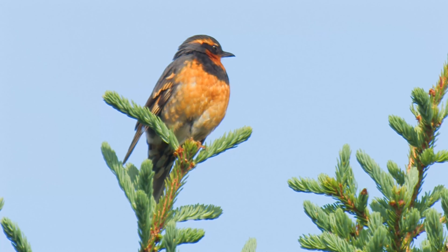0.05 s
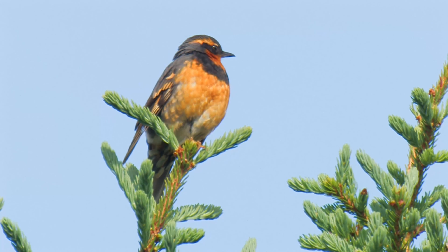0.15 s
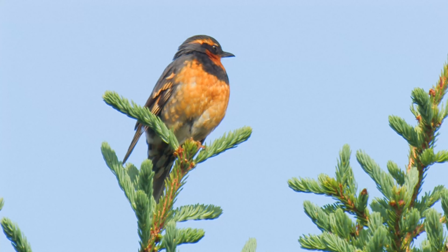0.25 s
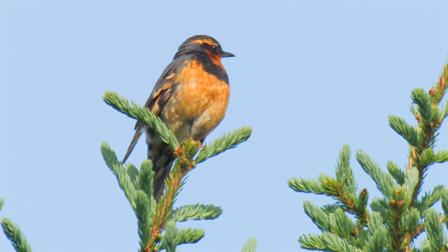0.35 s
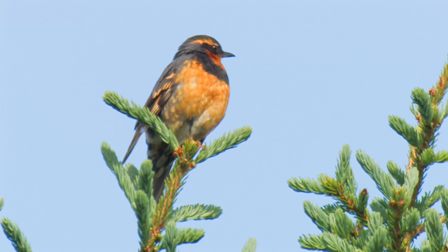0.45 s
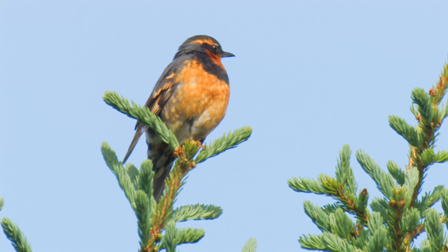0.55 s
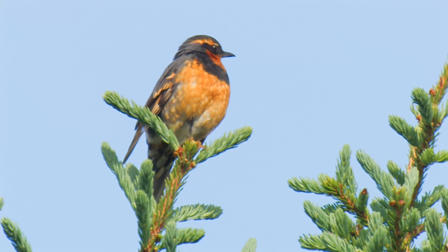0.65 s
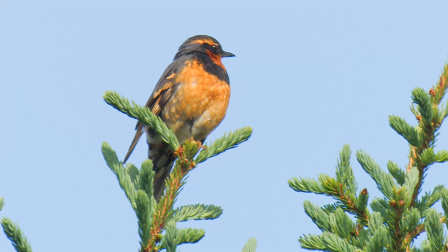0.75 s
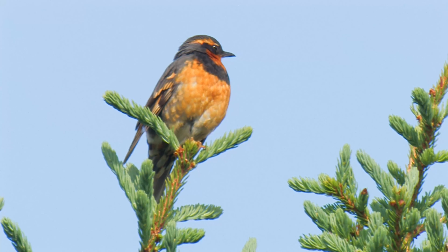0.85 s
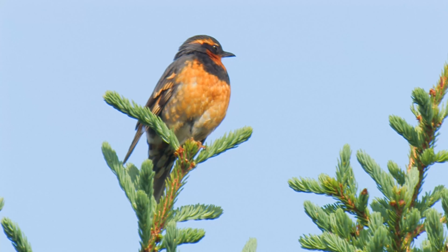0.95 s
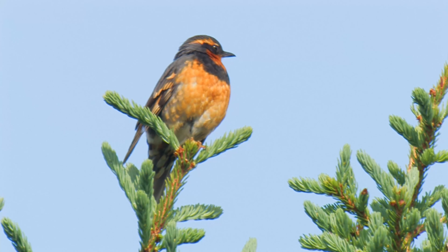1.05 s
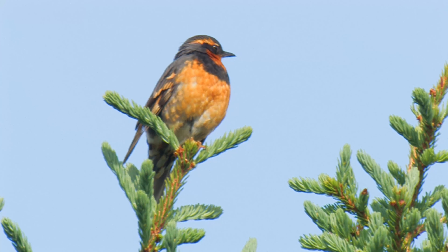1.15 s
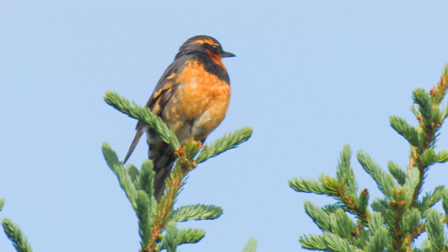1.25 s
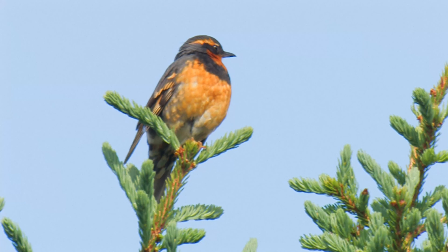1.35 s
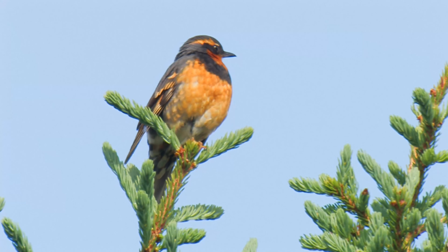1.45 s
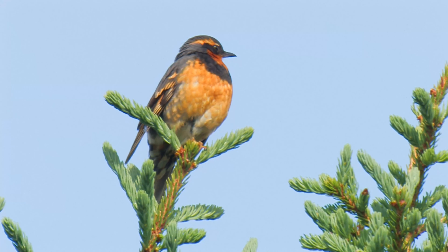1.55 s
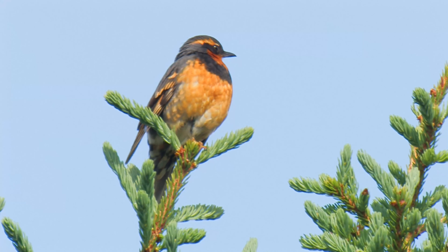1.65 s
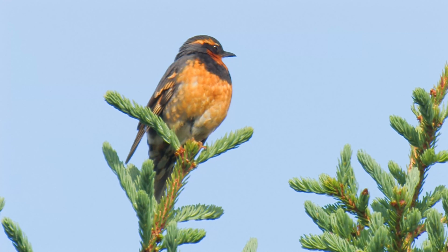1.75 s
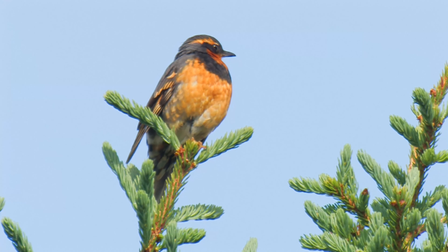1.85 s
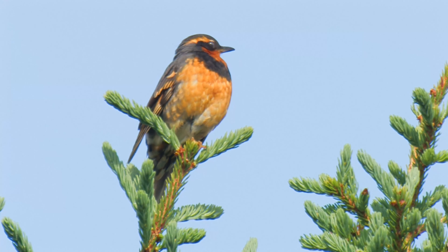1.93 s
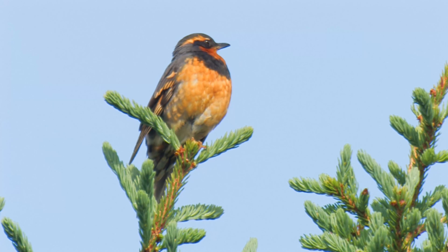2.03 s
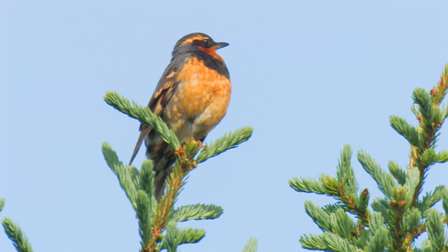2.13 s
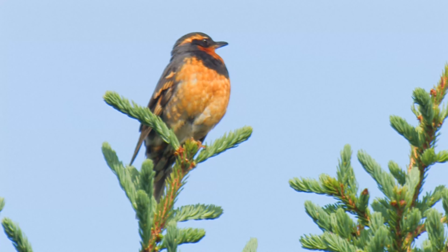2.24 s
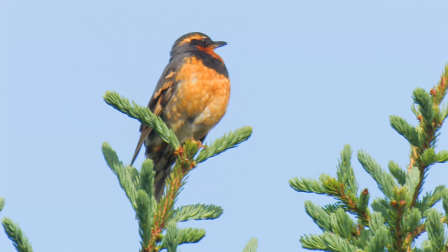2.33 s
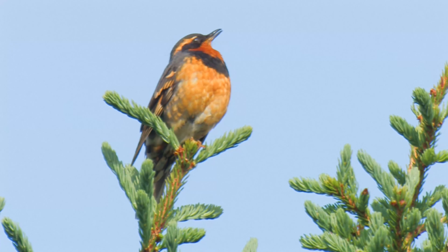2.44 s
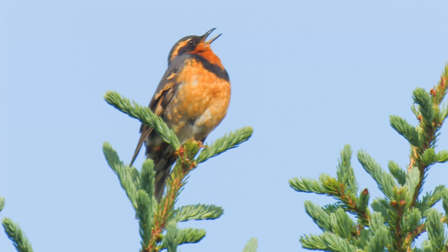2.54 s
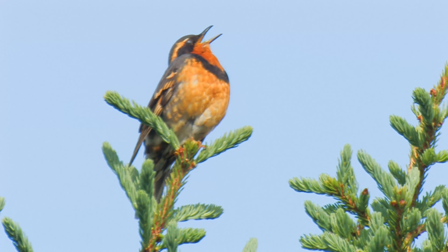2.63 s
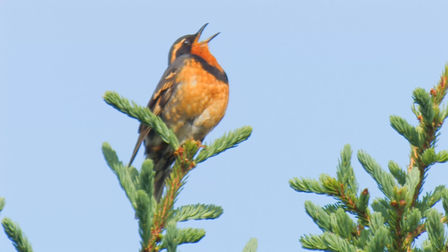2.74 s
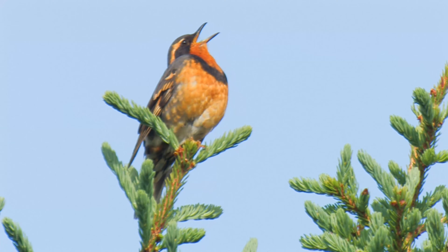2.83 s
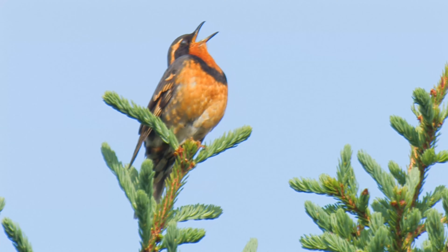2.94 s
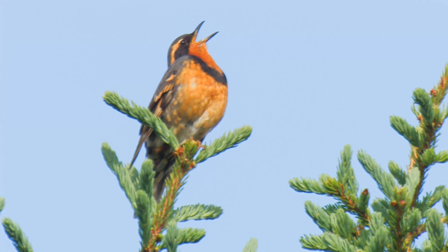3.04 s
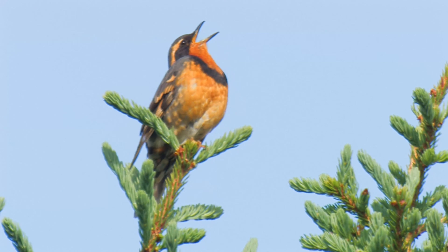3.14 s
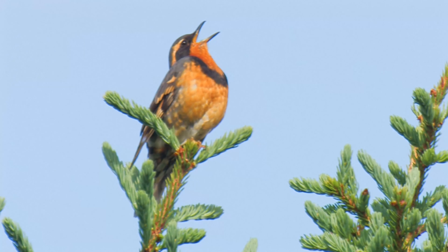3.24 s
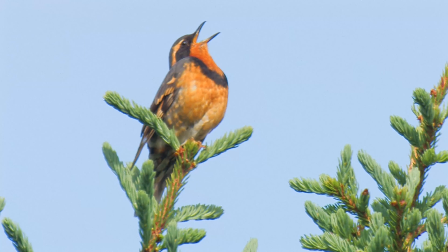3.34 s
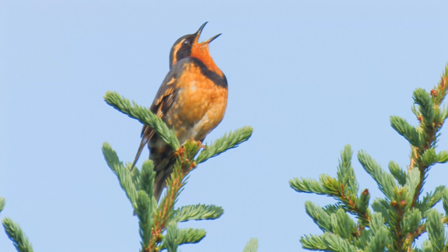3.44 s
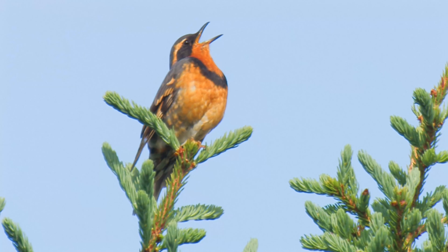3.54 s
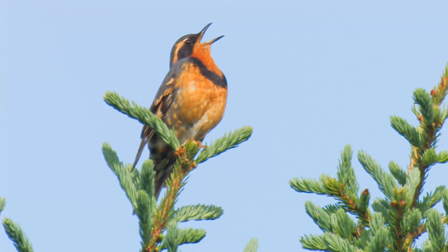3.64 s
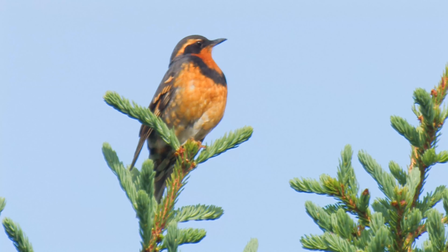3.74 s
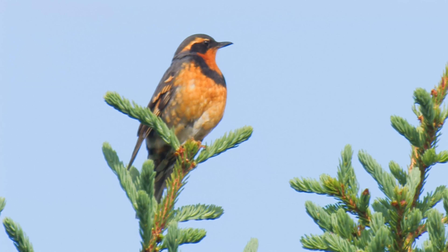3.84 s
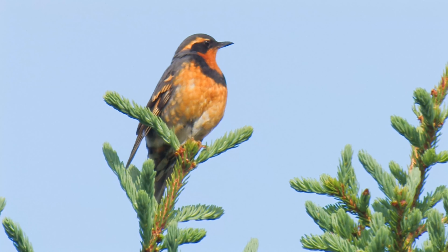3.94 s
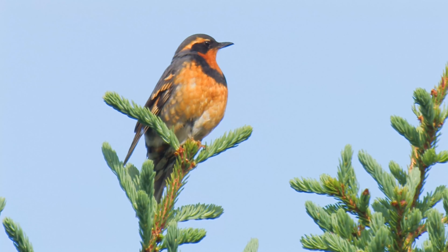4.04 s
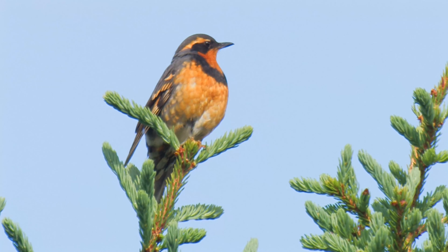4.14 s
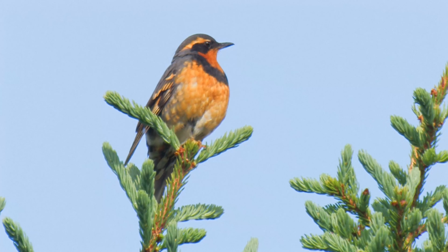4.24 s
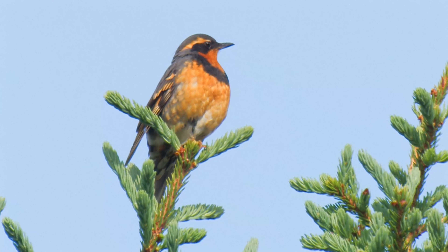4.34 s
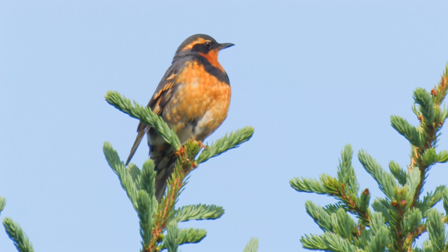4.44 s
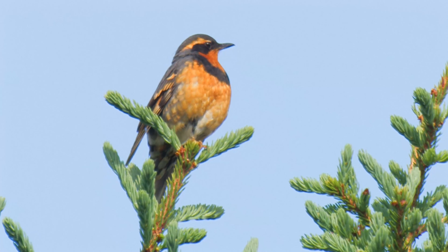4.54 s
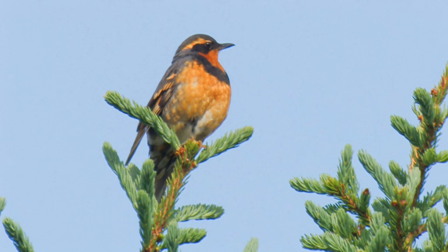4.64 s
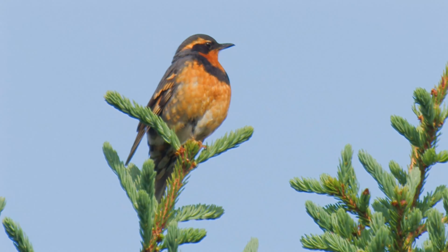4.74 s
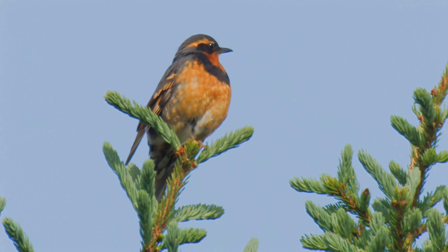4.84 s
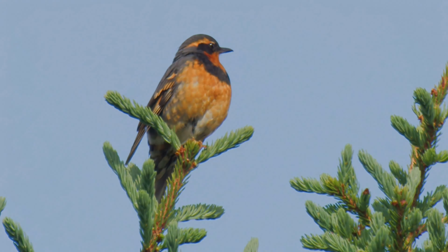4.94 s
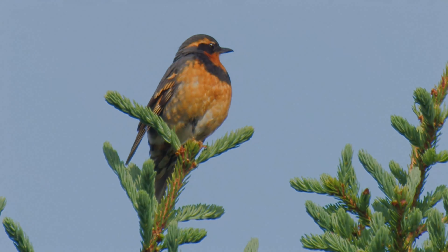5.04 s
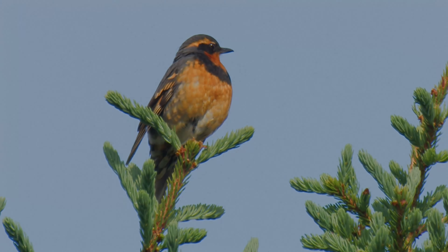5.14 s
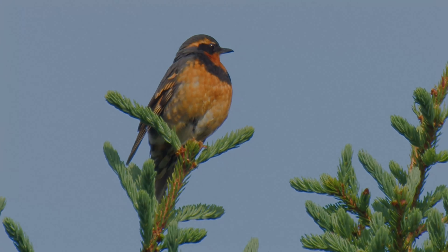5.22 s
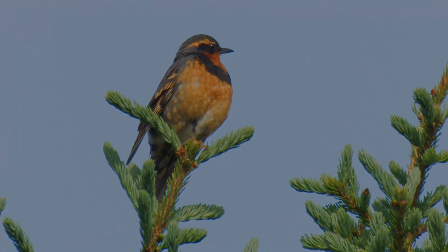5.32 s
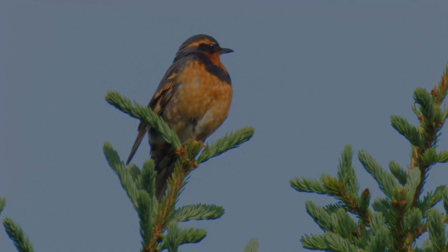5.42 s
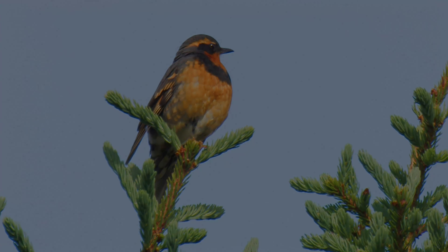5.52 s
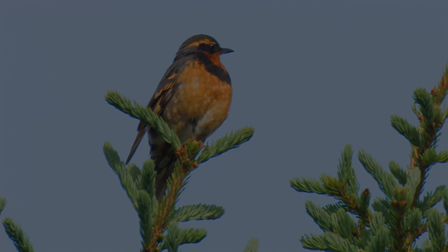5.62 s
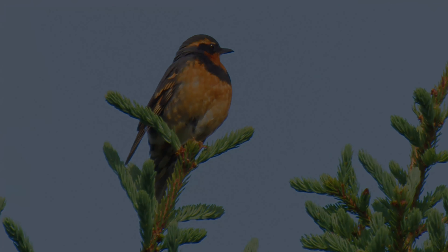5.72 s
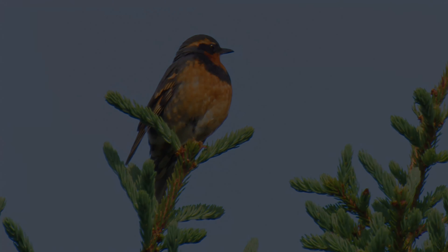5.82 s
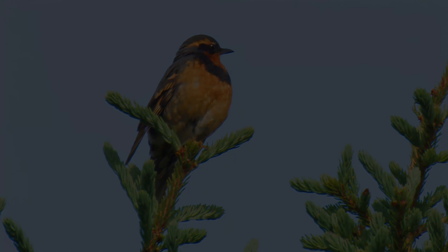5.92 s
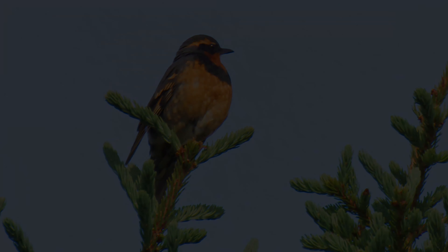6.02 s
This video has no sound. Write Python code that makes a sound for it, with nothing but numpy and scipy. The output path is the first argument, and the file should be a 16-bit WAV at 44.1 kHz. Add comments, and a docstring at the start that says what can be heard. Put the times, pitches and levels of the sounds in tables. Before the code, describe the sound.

Outdoors among trees, a soft low rush and a light microphone hiss run steadily. Faraway birds open with quick high twitters, falling slurs and a few rising chirps, all blurred by echo. A thrush stands out in front with a single rough, buzzing whistle of just over a second that rings briefly through the forest. A rapid, high, dry trill from another bird follows and fades away with the background.

```python
"""Small birds twitter, slur and chirp deep in an echoing forest, over a low, distant rush that never stops.
At 2.6 s a thrush on a spruce top sings one long buzzy whistle: the two sides of its syrinx beat
against each other. At 4.3 s a nearer bird starts a fast dry trill. From 4.5 s everything fades out."""
import sys
import numpy as np
from scipy import signal
from scipy.fft import rfft, irfft
from scipy.io import wavfile

SR = 44100
rng = np.random.default_rng(int(sys.argv[2]) if len(sys.argv) > 2 else 0)


def unload_audio(sound):
    """Save the sound as a 16-bit wav file, at the path given as the first command line argument."""
    columns = np.transpose(np.atleast_2d(sound))
    # keep every value between -1 and 1, then stretch to whole-number steps
    steps = np.round(np.clip(columns, -1, 1) * 32767)
    wavfile.write(sys.argv[1], SR, steps.astype(np.int16))


N = 267951
TIME = np.arange(N) / SR


def amp(db):
    """Decibels to gain."""
    return 10 ** (np.asarray(db) / 20)


def unit(x):
    """Scale to rms 1."""
    return x / np.sqrt(np.mean(abs(x) ** 2) + 1e-20)


def add(mix, start_s, sound):
    """Mix a sound in, cropped at both ends of the mix."""
    at = round(start_s * SR)
    sound = sound[max(-at, 0):]
    part = mix[max(at, 0):][:len(sound)]
    part += sound[:len(part)]


def phasor(hz):
    """Unit phasor following a pitch curve."""
    return np.exp(2j * np.pi * np.cumsum(hz) / SR)


def noise(spectrum):
    """Noise of rms 1, shaped by (freq_hz, density_db) points."""
    hz, db = np.transpose(spectrum)
    bins_hz = np.fft.rfftfreq(N, 1 / SR)
    gain = amp(np.interp(np.log(bins_hz + 1), np.log(hz + 1), db))
    return unit(irfft(rfft(rng.standard_normal(N)) * gain, N))


def waver(rate_hz, size=N):
    """Random drift of rms 1, rolled off above rate_hz."""
    bins_hz = np.fft.rfftfreq(size, 1 / SR)
    return unit(irfft(rfft(rng.standard_normal(size)) / (1 + (bins_hz / rate_hz) ** 4), size))


def forest(x, wet_db, t60_s, build_s):
    """Direct sound plus echoes scattered from trunks, building up and dying away."""
    t = np.arange(int(1.5 * SR)) / SR
    taps = rng.standard_normal(len(t)) * (rng.random(len(t)) < .1)
    tail = taps * amp(-60 * t / t60_s) * (1 - np.exp(-t / build_s))
    return x + amp(wet_db) * signal.fftconvolve(x, tail / np.linalg.norm(tail))[:len(x)]


def echo(x, delay_s, level_db):
    """Direct sound plus one distinct reflection."""
    return x + amp(level_db) * np.pad(x, (round(delay_s * SR), 0))[:len(x)]


def glide(length_s, start_hz, middle_hz, end_hz, level_db, swell_db=0, quaver_hz=0):
    """Whistle bending through three pitches; quaver_hz is the depth of its random wobble."""
    u = np.linspace(0, 1, max(round(length_s * SR), 8))
    hz = np.polyval(np.polyfit([0, .5, 1], [start_hz, middle_hz, end_hz], 2), u)
    hz += quaver_hz * waver(250, size=8192)[:len(u)]
    envelope = amp(level_db + swell_db * (u - .5)) * signal.windows.tukey(len(u), .4)
    return np.sqrt(2) * envelope * phasor(hz).real


def thrush(beat_start_hz=155.8, beat_sag_hz_per_s=10, beat_jitter_hz=5, jitter_hz=6.1, flutter_db=.5):
    """Two close syrinx voices beat; their coupling adds side tones and weak overtones."""
    # main voice: time_s, pitch_hz, level_db
    whistle = [(2.63, 3080, -76), (2.652, 3030, -54), (2.696, 3043, -42.5), (2.818, 3017, -33.5),
               (2.858, 3006, -35.5), (2.99, 3000, -31.5), (3.298, 2999, -28.5), (3.54, 2963, -30.5),
               (3.72, 2900, -29.5), (3.77, 2907, -32), (3.81, 2956, -36), (3.826, 2916, -29.5),
               (3.838, 2930, -43)]
    # side tones relative to the main voice: time_s, lower_voice_db, upper_combination_tone_db
    side_tones = [(2.63, -12.5, -30), (2.95, -6.5, -27), (3.12, -8.5, -22.5), (3.45, -9, -16.5),
                  (3.72, -15.5, -18)]
    # syrinx turbulence: freq_hz, density_db
    rasp_spectrum = [(1500, -40), (2100, -18), (2450, 3), (2950, -8), (3400, -1.5), (3800, -3.5), (4250, 0),
                     (4800, -13.5), (5600, -24.5), (8000, -38.5)]
    attack_s, release_s = .011, .016
    second_db, third_db, rasp_db, full_effort_db = -42.5, -38, -32, -30
    time_s, pitch_hz, contour_db = np.transpose(whistle)
    side_s, *side_db = np.transpose(side_tones)
    lower_db, upper_db = (np.interp(TIME, side_s, db) for db in side_db)
    beat_hz = beat_start_hz - beat_sag_hz_per_s * (TIME - time_s[0])
    beat = phasor(beat_hz + beat_jitter_hz * waver(60))
    lower = amp(lower_db + 1.6 * waver(56))
    upper = amp(upper_db + 1.7 * waver(50))
    voices = 1 + lower / beat + upper * beat
    # mutual modulation: faint tones two beat rates away
    voices -= amp(-21) * lower / beat ** 2 + amp(upper_db - 15) * beat ** 2
    carrier = phasor(np.interp(TIME, time_s, pitch_hz) + jitter_hz * waver(70))
    tone = carrier * voices / np.sqrt(1 + lower ** 2)
    attack = np.clip((TIME - time_s[0]) / attack_s, 0, 1)
    release = np.sin(np.pi / 2 * np.clip((time_s[-1] - TIME) / release_s + .25, 0, 1)) ** 2
    level_db = np.interp(TIME, time_s, contour_db) + flutter_db * waver(40)
    second = amp(second_db) * tone * carrier
    # third harmonic and rasp grow with effort; the beat swings one in pitch and pulses the other
    effort = amp(.5 * (level_db - full_effort_db))
    swing = np.exp(1.1j * beat.imag + .55j * waver(120))
    third = amp(third_db) * effort * tone * carrier ** 2 * swing / beat
    rasp = amp(rasp_db) * effort * abs(tone) * noise(rasp_spectrum)
    envelope = amp(level_db - .4) * attack * release
    song = envelope * (np.sqrt(2) * (tone + second + third).real + rasp)
    near_trees = forest(song, wet_db=-15.5, t60_s=.42, build_s=.03)
    return forest(near_trees, wet_db=-23, t60_s=1.45, build_s=.05)


def trill(start_s=4.2903, period_s=.05905, slowing_s=.000092, count=30, throat_hz=(3980, 5850)):
    """Nearer bird: each syllable a falling whistle and two whip sweeps; a close echo adds flutter."""
    # strokes of one syllable: offset_s, length_s, start_hz, middle_hz, end_hz, level_db, swell_db
    strokes = [(-.002, .03, 5375, 5112, 4080, -5.5, 21), (.0252, 0.0074, 7270, 4910, 3710, -4, 16.5),
               (.0318, 0.006, 7050, 5030, 3590, -4.5, 17.5)]
    steady_db, soft_start_db, swell_s = -41.7, -16.5, .22
    song = np.zeros(N)
    for n in range(count):
        onset_s = start_s + n * period_s + slowing_s * n * (n - 1) / 2
        level_db = steady_db + soft_start_db * np.exp((start_s - onset_s) / swell_s)
        whistle_ratio, stretch, whip_ratio = 1 + np.array([.006, .015, .02]) * rng.standard_normal(3)
        force_db = level_db + .65 * rng.standard_normal(len(strokes))
        for k, (offset_s, length_s, *bend_hz, db, swell_db) in enumerate(strokes):
            bend_hz = np.array(bend_hz) * (whip_ratio if k else whistle_ratio)
            stroke = glide(length_s * stretch, *bend_hz, force_db[k] + db, swell_db)
            add(song, onset_s + offset_s * stretch, stroke)
    # throat resonance passes the middle of each sweep
    song = signal.lfilter(*signal.butter(2, throat_hz, "bandpass", fs=SR), song)
    return forest(echo(song, delay_s=.0051, level_db=-6.5), wet_db=-10.5, t60_s=.73, build_s=.015)


def twitter(break_off_s=.78, preroll_s=.5):
    """Far bird, mostly echo: a repeated motif of a rising whistle under quavering glides."""
    # motif repeats: start_s, glides_db, whistle_db
    motifs = [(-.22, -50, -52), (.008, -48.5, -49.5), (.239, -48.5, -49.5), (.467, -51.5, -51.5),
              (.69, -56, -58)]
    # glides of one motif: offset_s, length_s, start_hz, middle_hz, end_hz, level_db
    motif_glides = [(.025, 0.038, 5300, 4620, 4130, -3), (0.083, 0.027, 5900, 4740, 4080, 1),
                    (0.119, 0.024, 4760, 5460, 5800, -0.5), (0.141, .065, 5750, 5060, 4090, 0.5),
                    (.207, .025, 5400, 4600, 4130, 1.5)]
    whistle_s, whistle_hz = .06, (3300, 3560, 4020)
    preroll = round(preroll_s * SR)
    glides, whistles = np.zeros((2, N + preroll))
    for start_s, glides_db, whistle_db in motifs:
        whistle = glide(whistle_s, *whistle_hz, whistle_db, swell_db=5, quaver_hz=44.7)
        add(whistles, start_s + preroll_s, whistle)
        for offset_s, length_s, *bend_hz, db in motif_glides:
            bend_hz = np.array(bend_hz) * (1 + .01213 * rng.standard_normal())
            if start_s + offset_s < break_off_s:
                note = glide(length_s, *bend_hz, glides_db + db, quaver_hz=87)
                add(glides, start_s + offset_s + preroll_s, note)
    glides = amp(-3) * forest(glides, wet_db=4.5, t60_s=.89, build_s=.01)
    whistles = forest(whistles, wet_db=0, t60_s=.52, build_s=.0074)
    return (glides + whistles)[preroll:]


def slurs():
    """Far bird: a swelling run of falling slurs, each ending in a rising chip; trees scatter the highs."""
    # run of slurs: start_s, level_db, pitch_ratio
    run = [(1.145, -62.5, 0.98), (1.334, -56.5, 0.97), (1.522, -53.5, 0.98), (1.708, -53.5, 0.98),
           (1.889, -54.5, 1.03), (2.072, -52, 1.01)]
    # fall of one slur: offset_s, pitch_hz, level_db
    contour = [(0, 5050, -6), (.006, 4736, -5), (.018, 4440, 0), (.045, 4220, -1.5), (.075, 4106, -2),
               (.092, 3735, -4.5), (.108, 3200, -5.5)]
    chip_offset_s, chip_length_s, chip_hz, chip_db = .117, .023, (3140, 3300, 3503), -5
    offset_s, pitch_hz, contour_db = np.transpose(contour)
    t = np.arange(0, offset_s[-1], 1 / SR)
    fall_hz = np.interp(t, offset_s, pitch_hz)
    envelope = np.sqrt(2) * amp(np.interp(t, offset_s, contour_db)) * signal.windows.tukey(len(t), .06)
    falls, chips = np.zeros((2, N))
    for start_s, level_db, pitch_ratio in run:
        drift_hz = 45 * waver(26, size=16384) + 110 * waver(300, size=16384)
        tone = phasor(pitch_ratio * fall_hz + drift_hz[:len(t)]).real
        add(falls, start_s, amp(level_db - 5) * envelope * tone)
        chip = glide(chip_length_s, *chip_hz, level_db + chip_db, quaver_hz=70)
        add(chips, start_s + chip_offset_s, chip)
    reflected = echo(falls, delay_s=.04, level_db=-4)
    scattered = forest(reflected, wet_db=.5, t60_s=.55, build_s=.014) - falls
    scattered = signal.lfilter(*signal.butter(4, 3550, "highpass", fs=SR), scattered)
    return falls + scattered + forest(chips, wet_db=-3, t60_s=.68, build_s=.018)


def chirps(start_s=2.251, period_s=.13, count=3, first_db=-59.5, step_db=-5.5):
    """Far pairs of rising chirps, high then low, dying away."""
    # one pair: offset_s, length_s, start_hz, middle_hz, end_hz, level_db
    pair = [(0, 0.051, 5060, 5440, 5780, -5.5), (0.05, .026, 4320, 4590, 4910, 0.5)]
    song = np.zeros(N)
    for k in range(count):
        for offset_s, *shape, db in pair:
            chirp = glide(*shape, first_db + k * step_db + db, quaver_hz=79.8)
            add(song, start_s + k * period_s + offset_s, chirp)
    return forest(song, wet_db=2.5, t60_s=.72, build_s=.011)


def peeps(run_start_s=2.075, period_s=.087, count=7, first_db=-74, step_db=.9):
    """Barely audible low notes: a few strays, then an even run of rising peeps."""
    # stray low notes: start_s, length_s, start_hz, middle_hz, end_hz, level_db
    strays = [(0.416, 0.042, 2840, 2670, 2486, -74), (.568, 0.049, 2408, 2098, 1957, -70),
              (.781, .034, 2980, 2500, 2020, -74), (0.911, 0.076, 2780, 2780, 2780, -72.5)]
    peep_s, peep_hz = .028, (2600, 2740, 3000)
    song = np.zeros(N)
    for start_s, *shape in strays:
        add(song, start_s, glide(*shape, quaver_hz=35.16))
    for k in range(count):
        peep = glide(peep_s, *peep_hz, first_db + k * step_db, quaver_hz=35)
        add(song, run_start_s + k * period_s, peep)
    return forest(song, wet_db=-7, t60_s=.6, build_s=.034)


def background(rush_db=-56, hiss_db=-67.5, whine_db=-82.5, whine_hz=6816):
    """Low distant rush, microphone hiss and a thin electronic whine."""
    # forest rush: freq_hz, density_db
    rush_spectrum = [(15, -33), (25, -2.5), (91, 0), (123, -3), (234, -4), (290, -7.5), (366, -4),
                     (430, -8), (573, -6.5), (638, -7.5), (749, -6), (1350, -20.5), (1800, -25),
                     (2340, -48), (3960, -120)]
    hiss_spectrum = [(1000, -11.5), (1600, -2), (2000, 4), (3200, 4), (5000, 2), (8000, -1), (15000, -1.5)]
    rush = amp(rush_db) * noise(rush_spectrum)
    hiss = amp(hiss_db) * noise(hiss_spectrum)
    whine = amp(whine_db) * np.sqrt(2) * phasor(whine_hz + 4 * waver(10)).real
    return rush + hiss + whine


def scene():
    """Birds over the background, mono."""
    birds = thrush() + twitter() + slurs() + chirps() + peeps() + trill()
    return (birds + background())[None]


def record(dry, fade_start_s=4.5, fade_end_s=6.37, cutoff_hz=15800):
    """Square-law fade-out, then a steep low-pass."""
    fade = np.clip((fade_end_s - TIME) / (fade_end_s - fade_start_s), 0, 1) ** 2
    lowpass = signal.firwin(511, cutoff_hz, window=("kaiser", 9), fs=SR)
    return signal.oaconvolve(dry * fade, lowpass[None], "same")


dry = scene()
out = record(dry)
unload_audio(out)
```